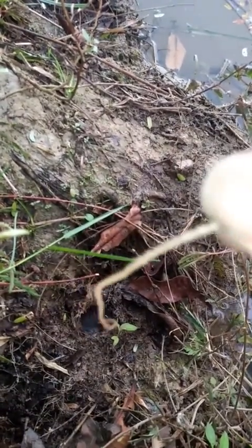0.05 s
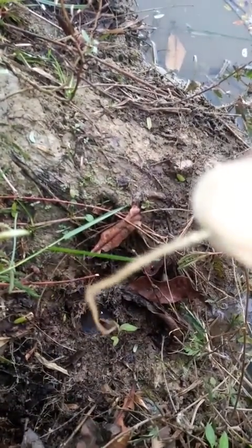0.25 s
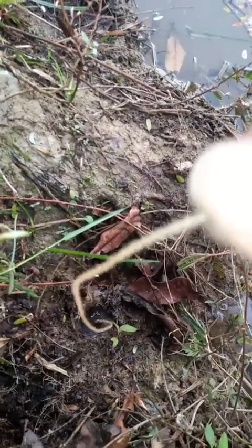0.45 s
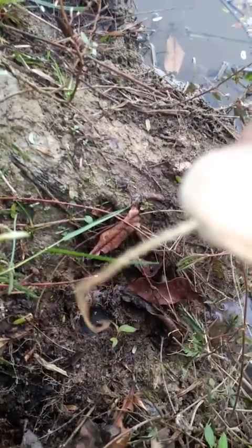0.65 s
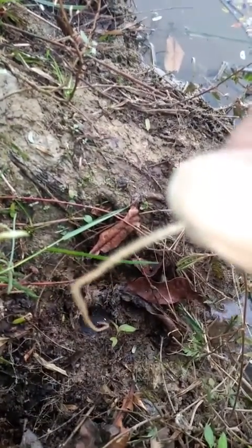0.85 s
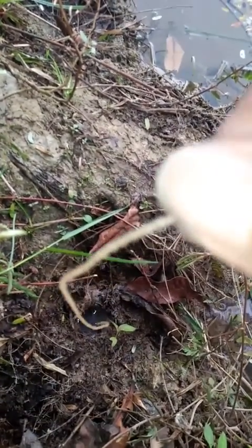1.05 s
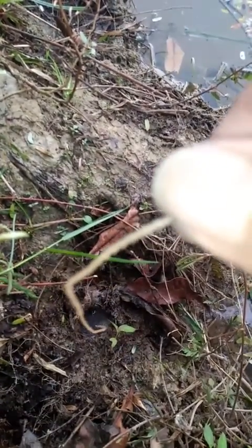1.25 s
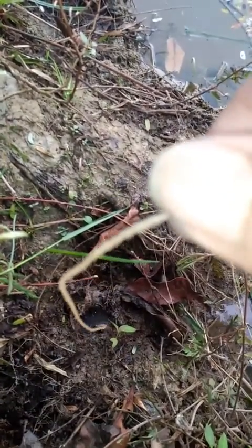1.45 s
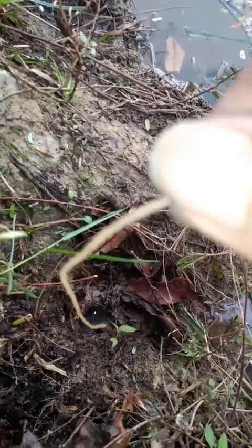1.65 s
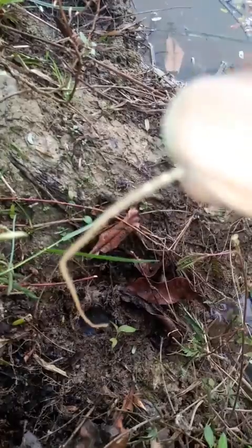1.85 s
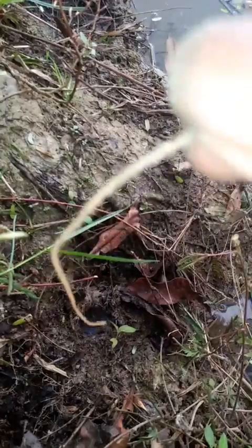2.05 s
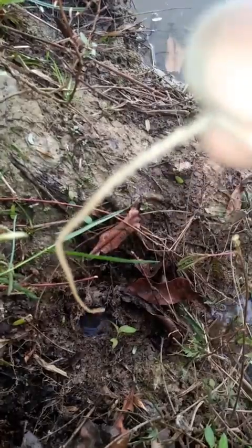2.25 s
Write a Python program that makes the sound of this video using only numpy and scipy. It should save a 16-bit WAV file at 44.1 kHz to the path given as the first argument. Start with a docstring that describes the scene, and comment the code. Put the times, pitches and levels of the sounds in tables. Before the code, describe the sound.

Short, snappy flicks of a grass stalk repeat evenly eight times, each scraping grit and plopping in a small mud hole. They sound close up outdoors, above quiet air, a thin wavering hiss and soft handling bumps.

```python
"""At a small hole in a muddy bank, a bent grass stalk is flicked eight times, close to the microphone.
Each flick is a 25 ms burst of snaps with a falling twang, as bending waves run along the stalk highs first.
The stalk scrapes grit from the mud and rings the air in the hole with a hollow plop. The surroundings
return a faint tail; a thin hiss swells and fades over quiet air, soft handling bumps and a few dry ticks."""
import sys
import numpy as np
from scipy import signal
from scipy.fft import irfft
from scipy.io import wavfile

SR = 44100
rng = np.random.default_rng(int(sys.argv[2]) if len(sys.argv) > 2 else 0)


def unload_audio(sound):
    """Save the sound as a 16-bit wav file, at the path given as the first command line argument."""
    columns = np.transpose(np.atleast_2d(sound))
    # keep every value between -1 and 1, then stretch to whole-number steps
    steps = np.round(np.clip(columns, -1, 1) * 32767)
    wavfile.write(sys.argv[1], SR, steps.astype(np.int16))


N = 101429
TIME = np.arange(N) / SR
AGE = np.arange(int(.06 * SR)) / SR  # seconds into one short hit


def amp(db):
    """Decibels to gain."""
    return 10 ** (np.asarray(db) / 20)


def fade(t, t60):
    """Exponential decay, 60 dB down after t60 seconds."""
    return np.exp(-np.log(1000) * t / t60)


def swell(t, peak_s, width_s):
    """A bell-shaped envelope."""
    return np.exp(-.5 * ((t - peak_s) / width_s) ** 2)


def colour(eq, f):
    """Gain of an EQ curve at the frequencies f."""
    hz, db = np.array(eq, float).T
    return amp(np.interp(np.log(f), np.log(hz), db))


def noise(eq, size):
    """Noise of rms 1, coloured by an EQ curve."""
    f = np.maximum(np.fft.rfftfreq(size, 1 / SR), 1)
    y = irfft(np.exp(2j * np.pi * rng.random(len(f))) * colour(eq, f), size)
    return y / y.std()


def ring(modes, scale=1):
    """Damped sines after one blow."""
    return sum(amp(db) * np.sin(2 * np.pi * hz * scale * AGE) * fade(AGE, t60) for hz, db, t60 in modes)


def add(out, start, sound):
    """Mix a sound in at its time."""
    i = int(start * SR)
    out[i:i + len(sound)] += sound[:len(out) - i]


def widen(mid, side, above_hz=8000):
    """Stereo in which only the treble differs between left and right."""
    side = signal.sosfilt(signal.butter(4, above_hz, "high", fs=SR, output="sos"), side)
    return np.array([mid + side, mid - side])


# tone of the outdoor air (frequency [Hz], level [dB])
AIR_EQ = [(25, -21), (70, -12), (200, -6.5), (370, -14.5), (500, -4), (790, 2.5), (1300, -3), (2050, 1.5),
          (2600, -5), (4000, -13), (7000, -15), (14000, -23)]
# low end of the air bed and of the handling bumps (frequency [Hz], level [dB])
RUMBLE_EQ = [(20, -40), (38, -15), (50, -3.5), (65, 5.5), (85, -5.5), (105, -2), (125, 2), (170, -12.5),
             (300, -17), (800, -46)]
# thin, high hiss (frequency [Hz], level [dB])
HISS_EQ = [(2000, -17), (5000, -20), (7000, -10), (8300, 0), (9400, 3.5), (10400, -3.5), (11800, -10.5),
           (14500, -12.5)]
# fader ride on the hiss (time [s], level [dB])
HISS_RIDE = [(0, -68), (0.211, -67), (.32, -58.5), (.42, -62), (.55, -61), (.63, -63), (.72, -60.5),
             (.87, -66.5), (.98, -57.5), (1.1, -66.5), (1.23, -57), (1.32, -61), (1.55, -59), (1.69, -55),
             (1.79, -60.5), (1.9, -56), (2.0, -61), (2.08, -52.5), (2.16, -57.5), (2.29, -57.5)]
def background(flicker_db=1.76, flickers_per_s=70, hiss_width=.55):
    """A bed of quiet air and low rumble under a thin hiss that swells, fades and flickers."""
    flicker = flicker_db * np.interp(TIME * flickers_per_s, np.arange(N), rng.standard_normal(N))
    hiss_gain = amp(np.interp(TIME, *np.array(HISS_RIDE).T) + flicker)
    bed = amp(-68) * noise(AIR_EQ, N) + amp(-75.5) * noise(RUMBLE_EQ, N)
    return widen(bed + hiss_gain * noise(HISS_EQ, N), hiss_width * hiss_gain * noise(HISS_EQ, N))


# handling bump cues (time [s], level [dB])
BUMP_CUES = [(0.102, -63.5), (0.247, -59), (.44, -63.5), (.555, -63.5), (0.661, -62), (.765, -64),
             (1.0, -66), (1.06, -63), (1.11, -63.5), (1.355, -64), (1.555, -60), (1.751, -63),
             (1.925, -63.5), (2.06, -68), (2.259, -64)]
def handling():
    """Soft low bumps from the hand that holds the microphone."""
    return noise(RUMBLE_EQ, N) * sum(amp(db) * swell(TIME, at, width_s=.012) for at, db in BUMP_CUES)


# tone of the reflections (frequency [Hz], level [dB])
REFLECTION_EQ = [(150, -37), (350, -15), (450, 1.5), (800, 0.5), (2100, 7.5), (2700, 1), (4500, -5),
                 (6500, -2.5), (9500, -1), (14000, -18)]
def reflections(source, db, t60, build_s):
    """The surroundings scatter the sound: its energy comes back late, as a dying wash of noise."""
    t = np.arange(SR) / SR
    onset = 1 - np.exp(-(t / build_s) ** 2)
    decay = (fade(t, t60) * onset) ** 2
    energy = signal.fftconvolve(source ** 2, decay / decay.sum())[:N]
    return amp(db) * np.sqrt(abs(energy)) * noise(REFLECTION_EQ, N)


# tick cues (time [s], level [dB])
TICK_CUES = [(.134, -48), (1.220, -44), (1.252, -36.5), (2.041, -42.5), (2.066, -34), (2.220, -46)]
# crisp top of a tick (frequency [Hz], level [dB])
TICK_EQ = [(1000, -17), (4000, -19), (9000, -1), (11000, -2), (13000, 2.5), (15000, -2.5)]
def ticks():
    """Tiny dry ticks around the flicks, each a fast-dying puff of bright noise."""
    out = np.zeros(N)
    for start, db in TICK_CUES:
        add(out, start, amp(db) * noise(TICK_EQ, len(AGE)) * fade(AGE, t60=.0093))
    return out


# rasp of the muddy grit (frequency [Hz], level [dB])
GRIT_EQ = [(250, -50), (450, -5.5), (1100, -2.5), (2100, 16), (2700, -8), (3700, -1), (5000, 1.5),
           (6800, -4), (9500, -12), (11500, -21), (14500, -14)]
def scrape(envelope):
    """The stalk rubs over the mud in a short rush of gritty noise."""
    return noise(GRIT_EQ, len(AGE)) * envelope


# low body of the hole (frequency [Hz], level [dB], t60 [s])
HOLE_LOW_MODES = [(484, -1, 0.025), (563, -4.5, .024)]
# upper hollow of the hole (frequency [Hz], level [dB], t60 [s])
HOLE_HIGH_MODES = [(775.5, 1, 0.034), (1256, -4.5, 0.026)]
def plop(low_db, high_db):
    """A rough push in mid-flick rings the air in the hole."""
    push = swell(AGE, peak_s=.016, width_s=.0037)
    out = np.zeros(len(AGE))
    for db, modes in (low_db, HOLE_LOW_MODES), (high_db, HOLE_HIGH_MODES):
        hollow = signal.fftconvolve(scrape(push), ring(modes))[:len(AGE)]
        out += amp(db) * hollow * np.linalg.norm(push) / np.linalg.norm(hollow)
    return out


def bending_wave(eq, delay_s, dispersion, fastest_hz=8012):
    """A click that has run along the stalk: highs arrive first, 500 Hz after delay_s. Peak 1."""
    f = np.maximum(np.fft.rfftfreq(SR, 1 / SR), 1)
    slowness = np.clip(f, 250, fastest_hz) ** -dispersion - fastest_hz ** -dispersion
    arrival_s = delay_s * slowness / np.interp(500, f, slowness)
    chirp = irfft(colour(eq, f) * np.exp(-2j * np.pi * np.cumsum(arrival_s)), SR)[:len(AGE)]
    return chirp / abs(signal.hilbert(chirp)).max()


def mud_stop(flick_age, stop_s=.02, width_s=.004):
    """The mud chokes the swinging stalk a set time into each flick."""
    return .5 - .5 * np.tanh((flick_age - stop_s) / width_s)


# body of the twang (frequency [Hz], level [dB])
TWANG_EQ = [(250, -35), (440, 0), (560, -8.5), (780, -6.5), (1000, 0), (1300, 0), (1800, 6), (2300, -12.5),
            (2800, -20.5), (3700, -12.5), (4700, -11.5), (5700, -36.5), (6500, -21), (7500, -57.5),
            (14000, -48)]
# flick cues (time [s], twang level [dB], twang delay at 500 Hz [s], low plop level [dB],
# high plop level [dB], grit level [dB], stalk pitch [Hz])
FLICK_CUES = [(0.2362, -28, 0.019, -59, -35, -33, 1855), (0.4437, -30.5, 0.017, -37.5, -35.5, -34, 2010),
              (0.6509, -25.5, .028, -33.5, -45, -40, 1854), (0.8947, -30, 0.018, -40, -55, -34.5, 1780),
              (1.1179, -28, 0.021, -38.5, -34, -36.5, 1816), (1.3440, -24.5, .015, -36, -38.5, -34.5, 1695),
              (1.5780, -25, 0.019, -37.5, -42.5, -34, 1710), (1.8100, -25.5, .016, -38, -43.5, -37, 1678)]
def flicks():
    """The bending stalk pings, twangs downward, scrapes the mud and makes the hole ring."""
    out = np.zeros(N)
    for start, twang_db, delay_s, low_db, high_db, grit_db, pitch in FLICK_CUES:
        ping = amp(-33) * np.sin(2 * np.pi * pitch * AGE) * swell(AGE, peak_s=.0041, width_s=.0031)
        twang = amp(twang_db) * bending_wave(TWANG_EQ, delay_s, dispersion=.8044) * mud_stop(AGE)
        grit = amp(grit_db) * scrape(swell(AGE, peak_s=.012, width_s=.009))
        add(out, start, ping + twang + grit + plop(low_db, high_db))
    return out


# hard edge of the crack (frequency [Hz], level [dB], t60 [s])
CRACK_MODES = [(3570, -23, 0.026), (4650, -19.5, 0.02), (5220, -4.5, 0.0098), (6560, -14.5, 0.013),
               (7740, -24, 0.019), (8350, -19, 0.0053), (9830, -34, .004)]
# bright splitting noise (frequency [Hz], level [dB])
SPLIT_EQ = [(600, 2), (1500, -30), (3000, -20), (5500, -22), (8000, 4.5), (9700, 9), (11500, -19),
            (14500, -2)]
# tone of the zip (frequency [Hz], level [dB])
ZIP_EQ = [(600, -2), (1000, -12.5), (1280, 2.5), (1480, -16.5), (1760, 12), (2200, -8), (2850, -11.5),
          (3600, -11), (4100, -17.5), (4650, 1.5), (5800, -7), (6450, 2), (7700, -21), (10000, -19.5),
          (14000, -27)]
# ring of the stalk (frequency [x stalk pitch], level [dB], t60 [s])
STALK_MODES = [(.72, -23.5, 0.019), (1, -8.5, 0.025), (1.13, -14, 0.0069), (1.27, -20, 0.006)]
# snap cues within the flicks (time [s], crack level [dB], split level [dB], ring level [dB],
# zip level [dB], zip delay at 500 Hz [s])
SNAP_CUES = [(.2370, -53, -29, -24.5, -34, 0.017), (0.2453, -52, -59, -17, -31.5, 0.015),
             (0.2524, -34, -44, -26.5, -32, 0.0096), (0.2574, -28, -35, -31, -40, .006),
             (.4450, -45, -46, -21, -30.5, 0.015), (.4510, -24, -34, -20, -29, 0.018),
             (0.456, -19.5, -20.5, -30, -33, .008), (.4630, -38, -33, -37, -24, .005),
             (0.472, -34, -36, -39, -44, 0.0093), (0.6517, -40, -50, -23.5, -47, .014),
             (.6570, -26.5, -53, -32, -39, 0.017), (0.6646, -21, -51, -28, -28, 0.0093),
             (0.6695, -48, -53, -17.5, -29, .006), (0.675, -27, -48, -51, -42, .010),
             (0.6792, -27, -47, -37, -38, 0.011), (0.8952, -42, -37, -28, -26.5, 0.01),
             (0.9021, -37, -29, -41, -30.5, 0.021), (0.9052, -21.5, -23, -33, -35, 0.015),
             (0.9157, -27.5, -34, -22, -24, 0.0052), (1.119, -46, -39, -28.5, -32, 0.015),
             (1.1279, -47, -49, -20.5, -29, 0.009), (1.1309, -26.5, -36, -25, -19.5, .008),
             (1.1417, -19, -42, -27, -28, 0.0096), (1.3439, -43, -36, -31.5, -27, .012),
             (1.3484, -22, -20, -25, -27, .015), (1.3567, -31, -20.5, -28, -23.5, 0.012),
             (1.3647, -27, -25.5, -24, -31, 0.0091), (1.5769, -52, -46, -34, -42, 0.011),
             (1.5834, -30, -29, -24, -33, 0.023), (1.5898, -16, -24.5, -15.5, -24, 0.0058),
             (1.598, -30, -29, -35, -26, .009), (1.8116, -47, -42, -27, -28.5, .011),
             (1.8170, -31, -26, -17, -23, 0.011), (1.819, -20.5, -17.5, -20.5, -22.5, 0.0047),
             (1.8265, -27.5, -24, -21.5, -29, 0.01), (1.8322, -27, -28, -43, -39, .009)]
def snaps():
    """The stalk snaps: a bright, splitting crack, a falling zip and a short ring at its flick's pitch."""
    out = np.zeros(N)
    burst = fade(AGE, t60=.0051) * (1 - np.exp(-AGE / .0006))  # 0.6 ms attack
    for start, crack_db, split_db, ring_db, zip_db, delay_s in SNAP_CUES:
        flick_start, *_, pitch = min(FLICK_CUES, key=lambda flick: abs(flick[0] - start))
        crack = amp(crack_db) * ring(CRACK_MODES)
        split = amp(split_db) * noise(SPLIT_EQ, len(AGE)) * burst
        choke = mud_stop(AGE + start - flick_start)
        zip_down = amp(zip_db) * bending_wave(ZIP_EQ, delay_s, dispersion=.4255) * choke
        add(out, start, crack + split + zip_down + amp(ring_db) * ring(STALK_MODES, pitch))
    return out


def scene():
    """The close stalk, too small to radiate bass, with its reflections over the background."""
    low_cut = signal.butter(5, 386, "high", fs=SR, output="sos")
    close = signal.sosfilt(low_cut, flicks() + snaps() + ticks())
    bank = reflections(close, db=-15.5, t60=.054, build_s=.0047)
    tail, tail_side = (reflections(close, db=-21, t60=.88, build_s=.013) for _ in range(2))
    return widen(close + bank + tail, tail_side) + background() + handling()


def record(dry, top_hz=14200):
    """A steep high cut on the whole mix."""
    return signal.sosfilt(signal.ellip(8, .2, 70, top_hz, fs=SR, output="sos"), dry)


dry = scene()
out = record(dry)
unload_audio(out)
```